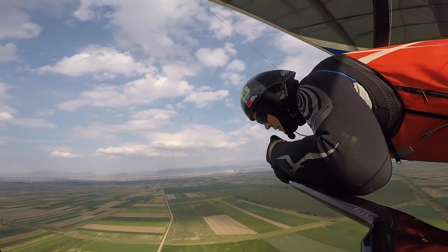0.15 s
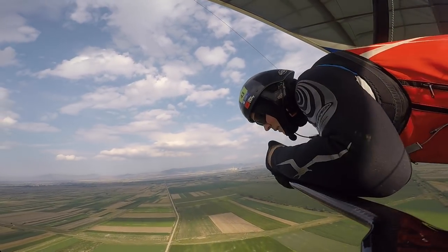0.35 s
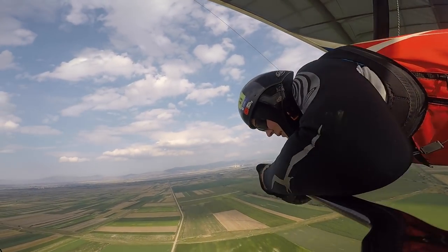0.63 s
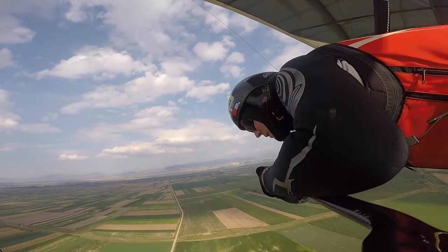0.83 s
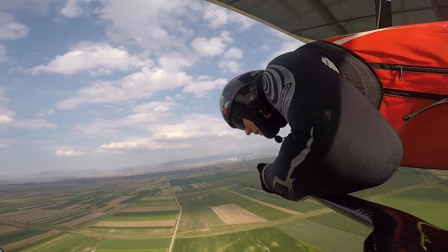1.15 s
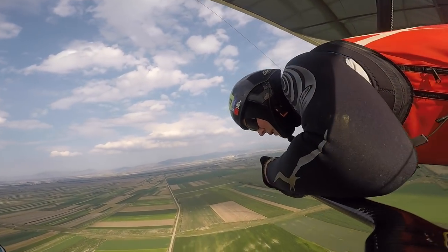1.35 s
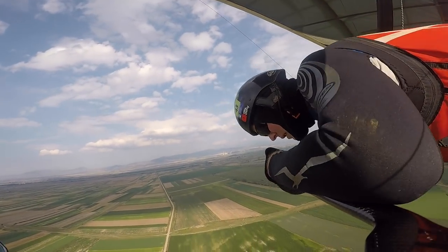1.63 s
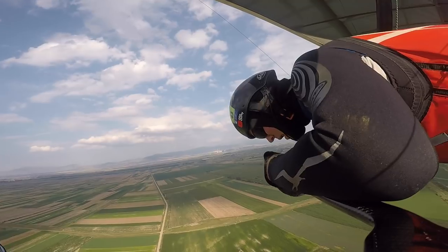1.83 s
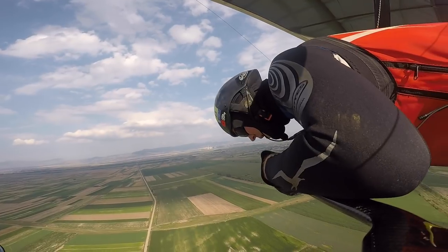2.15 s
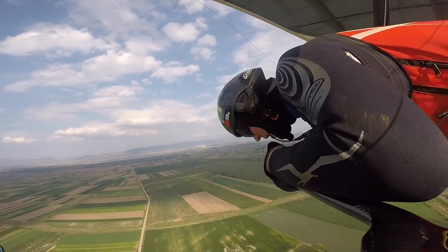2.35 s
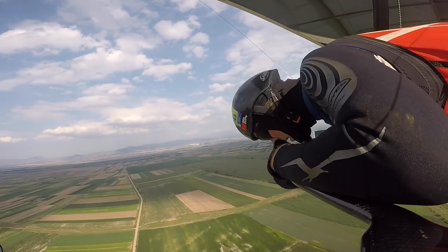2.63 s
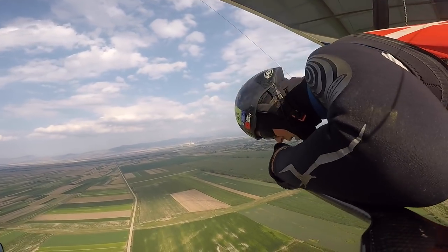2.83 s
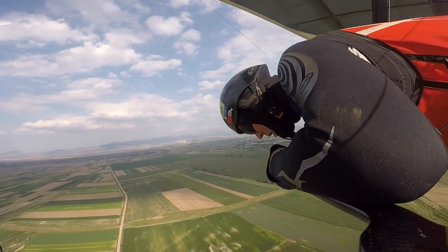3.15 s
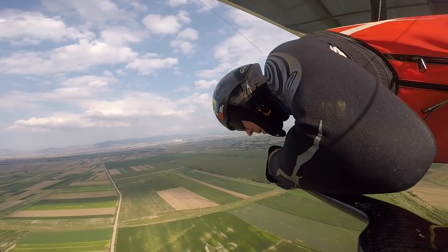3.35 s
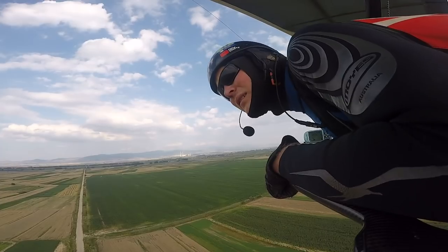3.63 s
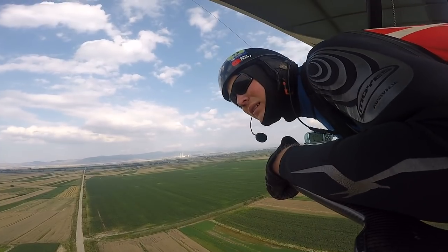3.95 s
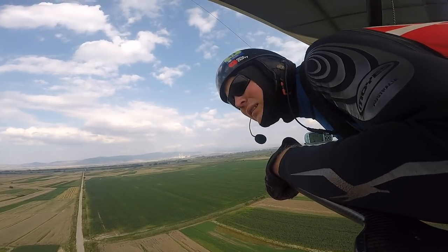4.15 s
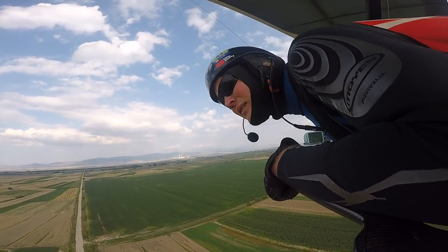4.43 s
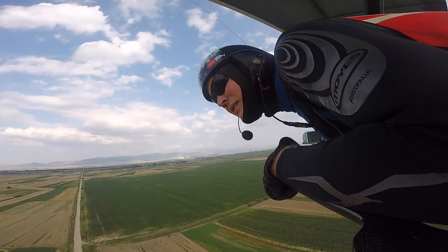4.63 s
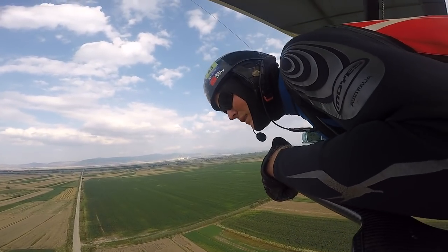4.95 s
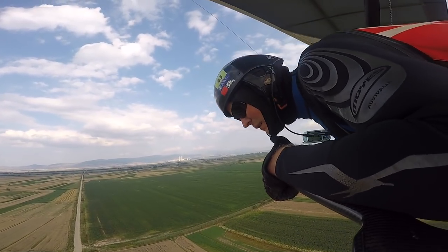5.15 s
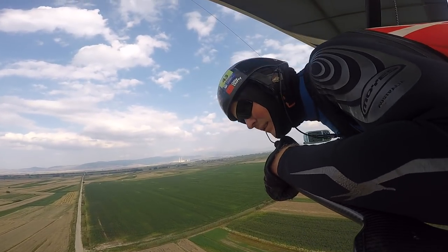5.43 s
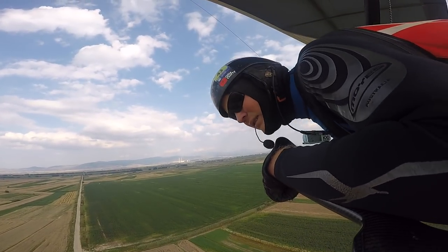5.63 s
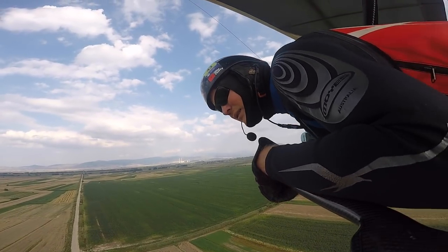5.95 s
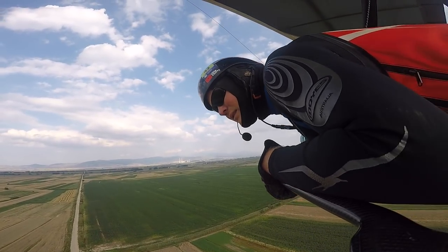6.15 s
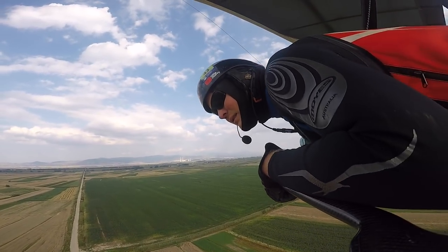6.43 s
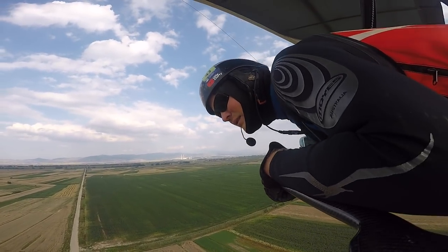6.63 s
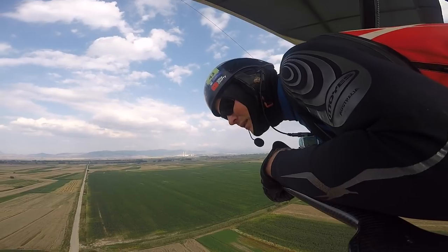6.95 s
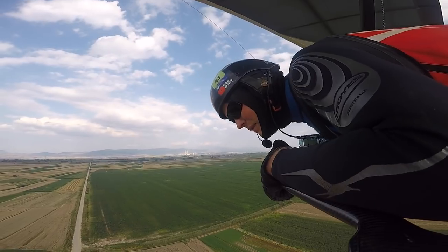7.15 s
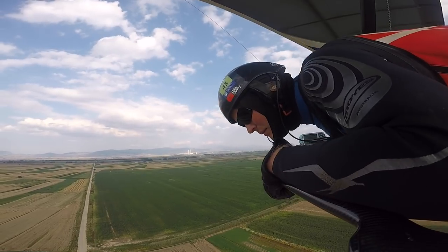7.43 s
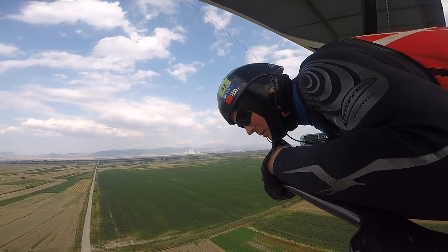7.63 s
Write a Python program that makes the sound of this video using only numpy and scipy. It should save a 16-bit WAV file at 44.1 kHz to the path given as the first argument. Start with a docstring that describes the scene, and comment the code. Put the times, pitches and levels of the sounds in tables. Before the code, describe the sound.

From 0 s, strong wind hits a small microphone mounted on a hang glider's frame in flight. Deep, irregular buffeting and low rumble are loudest, rounded off on the strongest swings, over a steady broad roar. A hollow tube adds breathy, wavering mid-pitched tones, and fine hiss sits on top. Thin whistles slide slightly from about 0.2 s to 2.4 s, the clearest falling near 0.8 to 1 s. Heavier thumps land around 2.4, 2.6 and 3.2 s. At 3.6 s a hard dry click marks an abrupt cut. Around it and until about 5.1 s, tiny rapid rising chirps flicker high in the hiss, densest from 4.2 to 4.8 s. Brief whistles return around 4.8 to 5.6 s. Afterwards the buffeting is generally somewhat lighter and uneven, with blows near 6.5 and 7.6 s, and the wind continues to the end near 8 s.

```python
"""Wind at a small camera on the control frame of a hang glider, taken by one microphone in the airstream.
From the start slow eddies buffet the diaphragm, under a broad roar of noise from pilot and frame;
a hollow frame tube sings as noise in its pipe modes, and fine turbulence hisses in the microphone port.
Sliding sine whistles come and go from 0.2 s; towards the middle short rising tone bursts chirp,
and at 3.59 s a hard edit clicks as a step in pressure. The wind then blows on to the end."""
import sys
import numpy as np
from scipy import signal
from scipy.io import wavfile
from scipy.ndimage import uniform_filter1d

SR = 44100
rng = np.random.default_rng(int(sys.argv[2]) if len(sys.argv) > 2 else 0)


def output_pcm(signal):
    """Save a mono or channel-first signal as 16-bit PCM at the path in sys.argv[1].

    Samples are clipped to [-1, 1] before scaling.
    """
    pcm = np.clip(np.atleast_2d(signal).T, -1, 1) * 32767
    wavfile.write(sys.argv[1], SR, np.round(pcm).astype(np.int16))


def elevation(decibels):
    """Turn decibel levels (scalar or array-like) into linear amplitude ratios."""
    levels = np.asarray(decibels, float)
    return 10 ** (levels / 20)


N = 343980
HZ = np.fft.rfftfreq(2048, 1 / SR)
FRAME_S = np.arange(N // 512 + 5) * 512 / SR

# Wind at the camera. Each row: time in seconds, buffeting control in dB, control of the air over the
# frame in dB, centre of the loudest pipe modes in Hz, quick eddies above the buffeting in dB.
WIND = [(0.0, -10, -28, 1290, -7.5), (0.17, -11, -28.5, 1350, -1.5), (0.5, -12.5, -28.5, 1440, -3.5),
        (0.85, -13, -29.5, 1420, -4.5), (1.3, -12, -28, 1400, -1), (1.78, -13, -31, 1240, -6),
        (2.35, -13, -28, 1286, 0), (2.54, -15, -31, 1350, -4), (3.43, -13.5, -29, 1340, -6),
        (3.7, -13.5, -29.5, 1340, -4.5), (4.0, -17.5, -28.5, 1315, -1), (4.4, -14, -28.5, 1325, -2.5),
        (4.8, -12.5, -30, 1360, -4.5), (5.0, -15.5, -30, 1350, -7), (5.34, -19, -28.5, 1356, -4.5),
        (5.41, -19.5, -29, 1350, -6), (5.54, -16.5, -29.5, 1330, -9), (5.91, -17.5, -31, 1250, -2.5),
        (6.04, -18.5, -31, 1430, -7.5), (6.26, -16.5, -30.5, 1253, -4), (6.56, -19.5, -29, 1310, -6),
        (6.67, -18, -30.5, 1280, -3.5), (7.04, -14.5, -29.5, 1320, -7), (7.08, -16, -29.5, 1380, -7.5),
        (7.36, -15.5, -28, 1314, -4), (7.65, -16, -30, 1325, -2.5), (7.67, -23, -29, 1290, -4),
        (7.8, -15, -28, 1255, -4)]
MEAN_BUFFET_DB, MEAN_AIR_DB = -14, -29

# Each layer: level in dB in mean wind, dB gained per dB of its wind control.
THUMP_LAW, EDDY_LAW, FLUTTER_LAW = (-18.5, 1.1), (-12.5, 0.71), (-25.5, 0.26)
ROAR_LAW, SONG_LAW, HISS_LAW = (-31, 0.56), (-31.5, 0.9), (-38, 0.27)

# Spectra of the large slow eddies and of the quicker ones at the microphone.
# Each row: frequency in Hz, relative density in dB per Hz.
THUMP_SPECTRUM = [(8, -30), (14, -6.5), (30, -2), (42, -5.5), (60, -13.5), (90, -55)]
EDDY_SPECTRUM = [(30, -23), (45, 0.5), (95, -2), (130, -5.5), (190, -20), (300, -43.5)]
# Single blows of large eddies. Each row: middle in seconds, change of the thumps in dB.
BLOWS = [(.09, 0), (.63, -8), (.93, 8), (1.4, -1), (1.58, -2), (1.77, -3), (2.28, 4), (2.39, 8),
         (2.58, 11.5), (2.8, 3), (2.89, 0), (3.17, 12.5), (3.6, 3.5), (4.58, 10.5), (5.26, 5.5), (6.54, 10),
         (7.04, 3), (7.34, 2.5), (7.6, 9)]
BLOW_S = 0.016  # half length
SIZE_SWING_DB, SIZE_PER_S = 2, 7  # rms wander of the thump level; averaged over 1/7 s

# Spectra of the roar round pilot and frame and of the flutter of small eddies under it.
# Each row: frequency in Hz, relative density in dB per Hz.
ROAR_SPECTRUM = [(250, -24), (430, -4.5), (560, -2.5), (900, -3.5), (1300, -9), (1700, -6), (2100, -10.5),
                 (3100, -17), (5000, -25), (6500, -34.5), (8200, -37.5), (10000, -49.5), (12500, -64),
                 (12900, -86)]
FLUTTER_SPECTRUM = [(90, -12.5), (150, 2), (200, -0.5), (260, -4), (325, -4.5), (430, -11.5), (600, -26.5)]
# Spells of altered flutter. Each row: middle in seconds, half length in seconds, change in dB.
FLUTTER_SWELLS = [(.85, 0.29, 3), (3.1, 0.34, -0.5), (7.5, .4, 0.5)]

# Pipe modes of the open frame tube. Each row: centre in Hz, width at half amplitude in Hz, peak in dB.
TUBE_MODES = [(884, 77, -13), (1004, 44, 0), (1107, 30.6, 3), (1213, 54, 0), (1316, 52, -1.5),
              (1409.4, 47, -1), (1521, 64, -0.5), (1626, 40, 0.5), (1741, 61, -2), (1873, 63, -1),
              (2040, 32, -1.5)]
SONG_HALF_WIDTH_HZ = 284  # distance from the centre pitch at which a mode is driven half as much
# Gusts over the tube. Each row: middle in seconds, half length in seconds, change of the song in dB.
TUBE_GUSTS = [(1.1, 0.043, -1), (1.33, 0.14, 0.5), (3.66, 0.078, 2.5), (4.38, 0.074, 1.5), (5.9, 0.11, 2),
              (6.3, .04, 0)]

# Hiss in the microphone port. Each row: frequency in Hz, relative density in dB per Hz.
HISS_SPECTRUM = [(2400, -11), (3300, -8), (3850, -1.5), (4600, -2), (5700, -5.5), (6500, -15), (7100, -31),
                 (9000, -46.5)]
# Gusts straight into the port. Each row: middle in seconds, half length in seconds, lift of the hiss in dB.
PORT_GUSTS = [(.1, 0.3, 1.5), (1.4, 0.093, 2), (2.2, 0.092, 3), (3.365, 0.018, 5), (3.46, 0.023, 5.5),
              (3.62, 0.1, 1.5), (3.8, 0.43, 1.5), (4.42, 0.28, 2), (4.9, 0.6, 1.5), (7, 1, 1.5)]

# Clear whistles. Each row: start in seconds, length in seconds, first Hz, last Hz, rms level in dB.
WHISTLES = [(0.198, 0.2, 1540, 1518, -43), (.2, 0.15, 1325, 1317, -39), (0.414, 0.33, 1415, 1453, -40),
            (.4, 0.28, 1200, 1220, -45), (0.775, 0.25, 1505, 1376, -30.5), (0.853, 0.11, 1220, 1225, -39),
            (1.064, 0.21, 1525, 1544, -42), (1.185, .07, 1410, 1430, -38), (1.43, 0.052, 1305, 1285, -35),
            (1.065, 0.046, 1400, 1428, -32), (1.495, 0.14, 1115, 1120, -42.5),
            (4.79, 0.13, 1212, 1202, -38.5), (4.96, 0.22, 1305, 1320, -36.5), (5.37, 0.11, 1240, 1215, -38),
            (5.449, 0.13, 1340, 1310, -36), (1.335, 0.24, 1292, 1302, -40),
            (1.837, 0.27, 1280, 1303, -34.5), (2.283, 0.15, 1317, 1320, -40),
            (3.166, 0.35, 1316, 1295, -41), (3.607, 0.11, 1330, 1311, -38)]
WHISTLE_EDGE_S, WHISTLE_BEND = 0.006, 0.85  # linear fade; exponent of the slide, below 1 slows it

# Rising chirps as gusts catch the port edge. Each row: middle in seconds, peak in dB, middle pitch in Hz.
CHIRPS = [(3.513, -31, 4750), (3.541, -32, 4100), (3.603, -34, 5100), (3.706, -29, 4540), (3.73, -38, 5400),
          (3.7718, -30, 4360), (3.812, -33, 3850), (3.852, -33, 5000), (4.467, -29, 3900),
          (4.498, -30, 4200), (4.632, -35, 3800), (4.68, -34, 4930), (4.801, -30, 4560),
          (4.2494, -33, 4440), (4.3244, -31, 4530), (4.3844, -26.5, 4420), (4.386, -33, 5000),
          (4.4438, -27, 4370), (4.566, -29, 4230), (4.6054, -29, 4280), (4.7944, -34, 4500),
          (5.003, -29, 4460), (4.281, -32, 4550), (4.3562, -33, 4600), (4.4146, -29, 4270),
          (4.66, -34, 4500), (4.8282, -33, 4650), (4.9609, -33, 4560), (5.0726, -35, 4100),
          (5.095, -35, 4200)]
# A spell of fainter random chirps. One row: middle in seconds, half length in seconds, most per second,
# mean peak in dB, mean pitch in Hz, half of the largest pitch offset in Hz.
TWITTER = (4.5, 1, 77, -41.5, 4243, 199.5)
CHIRP_S, CHIRP_RISE_HZ_PER_S = 0.0036, 50000  # half length; sweep rate

EDIT_S, EDIT_DB, EDIT_FADE_S = 3.59, -11, 0.0018  # place, step height either side of zero, decay time
LOW_EDGE_HZ, HIGH_EDGE_HZ = 4, 12700


def evened(x):
    """Scales to rms 1."""
    return x / np.sqrt(np.mean(x ** 2) + 1e-20)


def colour(points):
    """Gain per bin from a spectrum table, joined over log frequency."""
    hz, db = np.transpose(points)
    return elevation(np.interp(np.log(HZ + 1), np.log(hz + 1), db, -120, -120))[:, None]


def curve(table, column, s):
    """One column of a table at the times s."""
    rows = np.array(table)
    return np.interp(s, rows[:, 0], rows[:, column])


def follow(law, column):
    """Level in dB of a layer driven by buffeting (1) or by air over the frame (2)."""
    mean_db = (MEAN_BUFFET_DB, MEAN_AIR_DB)[column - 1]
    level_db, gain = law
    return level_db + gain * (curve(WIND, column=column, s=np.arange(N) / SR) - mean_db)


def bumps(rows):
    """Sum of bell-shaped level changes in dB; each half length reaches to 1/e."""
    t = np.arange(N) / SR
    return sum(db * np.exp(-((t - s) / half) ** 2) for s, half, db in rows)


def turbulence(shape, patchy_db, flicker_db, size=20):
    """Random short-time spectra with drifting patches and a flicker common to all bins."""
    real, imaginary, patches = rng.standard_normal((len(FRAME_S), len(HZ), 3)).T
    patches = uniform_filter1d(patches, size=size, axis=0)  # over frequency
    patches = evened(uniform_filter1d(patches, size=6, axis=1))  # over time
    flicker = rng.standard_normal(len(FRAME_S))
    spectra = (real + 1j * imaginary) * shape * elevation(patchy_db * patches + flicker_db * flicker)
    return evened(signal.istft(spectra, nperseg=2048, noverlap=1536)[1][:N])


def lumps(spectrum, steady, span):
    """Pressure swings of passing eddies, evened over span samples to vary less in size than plain noise."""
    x = turbulence(colour(spectrum), patchy_db=2.0, flicker_db=0, size=2)
    size = np.sqrt(abs(uniform_filter1d(x ** 2, span)) + 0.062)
    return evened(x / size ** np.clip(steady, 0, 1))


def buffeting():
    """Large slow eddies thump, smaller ones flutter; the stiffening diaphragm rounds off large swings."""
    span = round(SR / SIZE_PER_S)
    wander = uniform_filter1d(rng.standard_normal(N), span)
    size_db = SIZE_SWING_DB * evened(uniform_filter1d(wander, span // 2))
    blows_db = bumps([(s, BLOW_S, db) for s, db in BLOWS])
    quick_db = curve(WIND, column=4, s=np.arange(N) / SR)
    # as with gain control, the quick rumble is turned down when the thumps are strong,
    # and up when they are weak
    thump_db = follow(THUMP_LAW, column=1) + size_db + blows_db - 0.95 * quick_db
    eddy_db = follow(EDDY_LAW, column=1) + quick_db - 0.48 * (size_db + blows_db)
    thumps = lumps(THUMP_SPECTRUM, steady=1.0, span=3000) * elevation(thump_db)
    eddies = lumps(EDDY_SPECTRUM, steady=0.53, span=2500) * elevation(eddy_db)
    knee = elevation(-4.5)
    return knee * np.tanh((thumps + eddies) / knee)


def roar():
    """Broad turbulence round pilot and frame, with a flutter of small eddies under it."""
    broad = turbulence(colour(ROAR_SPECTRUM), patchy_db=.5, flicker_db=.1)
    broad = broad * elevation(follow(ROAR_LAW, column=2))
    flutter = lumps(FLUTTER_SPECTRUM, steady=0.09, span=1500)
    return broad + flutter * elevation(follow(FLUTTER_LAW, column=1) + bumps(FLUTTER_SWELLS))


def tube_song():
    """Noise in the pipe modes; a typed centre pitch sets which of them sound loudest."""
    power = sum(elevation(2 * db) / (1 + (2 * (HZ - hz) / width) ** 2) ** 2 for hz, width, db in TUBE_MODES)
    offset_hz = HZ[:, None] - curve(WIND, column=3, s=FRAME_S)
    drive = 1 / (1 + (offset_hz / SONG_HALF_WIDTH_HZ) ** 2)
    song = turbulence(np.sqrt(power)[:, None] * drive, patchy_db=.5, flicker_db=.2)
    return song * elevation(follow(SONG_LAW, column=2) + bumps(TUBE_GUSTS))


def port_hiss():
    """Fine turbulence lifted by the resonance of the microphone port."""
    hiss = turbulence(colour(HISS_SPECTRUM), patchy_db=.7, flicker_db=.4)
    return hiss * elevation(follow(HISS_LAW, column=2) + bumps(PORT_GUSTS))


def whistle(start, length, first_hz, last_hz, db):
    """A nearly pure edge tone with a slight waver; its slide slows towards the end."""
    s = np.arange(N) / SR - start
    waver = 1 + .003 * evened(uniform_filter1d(rng.standard_normal(N), size=900))
    hz = first_hz + (last_hz - first_hz) * np.clip(s / length, 0, 1) ** WHISTLE_BEND
    gate = np.clip(np.minimum(s, length - s) / WHISTLE_EDGE_S, 0, 1)
    return np.sqrt(2) * elevation(db) * gate * np.sin(2 * np.pi * np.cumsum(hz * waver) / SR)


def chirps():
    """Short soft tone bursts at the port edge whose pitch sweeps quickly upward."""
    out, t = np.zeros(N), np.arange(-800, 800) / SR
    middle, half, per_s, faint_db, faint_hz, spread_hz = TWITTER
    slot_s = .01
    slots = np.arange(.05, N / SR - .05, slot_s)
    chance, size, pitch = rng.random((len(slots), 3)).T
    taken = chance < slot_s * per_s * np.exp(-((slots - middle) / half) ** 2)
    peaks_db = faint_db + 6 * (size - .5)
    pitches_hz = faint_hz + 2 * spread_hz * (2 * pitch - 1)
    faint = np.transpose([slots, peaks_db, pitches_hz])[taken]
    for s, db, hz in [*CHIRPS, *faint]:
        phase = 2 * np.pi * np.cumsum(hz + CHIRP_RISE_HZ_PER_S * t) / SR
        burst = np.exp(-(t / CHIRP_S) ** 2) * np.sin(phase)
        first = round((s + CHIRP_S) * SR) - 800
        out[first:][:len(t)] += elevation(db) * burst
    return out


def edit_click(sound):
    """Two shots butt together, one ending high in pressure, the next starting low; the wind dips at the step."""
    after = np.arange(N) / SR - EDIT_S
    near = np.exp(-abs(after) / EDIT_FADE_S)
    step = -elevation(EDIT_DB) * np.sign(after) * near
    return sound * (1 - near ** 2) + step


def scene():
    """All the wind sounds at one microphone."""
    whistles = sum(whistle(*row) for row in WHISTLES)
    return (buffeting() + roar() + tube_song() + port_hiss() + whistles + chirps())[None]


def band_limit(x):
    """A steep low-pass at the top of the band."""
    return signal.sosfilt(signal.butter(12, 15880, fs=SR, output="sos"), x)


def record(dry):
    """The microphone's sound loses its extreme treble and bass, then takes the click of the edit."""
    limited = signal.filtfilt(signal.firwin(255, HIGH_EDGE_HZ, fs=SR), 1, dry)
    limited = signal.lfilter(*signal.butter(1, LOW_EDGE_HZ, "high", fs=SR), limited)
    joined = edit_click(limited)
    return band_limit(joined)


dry = scene()
out = record(dry)
output_pcm(out)
```